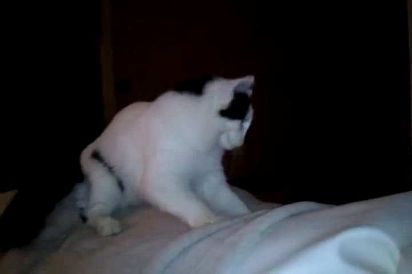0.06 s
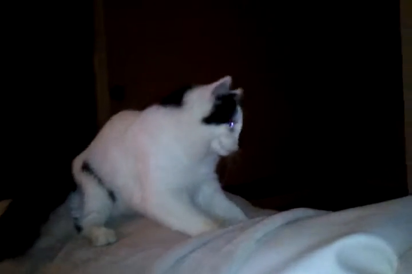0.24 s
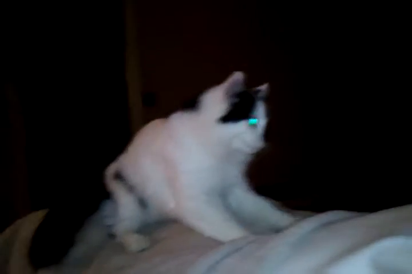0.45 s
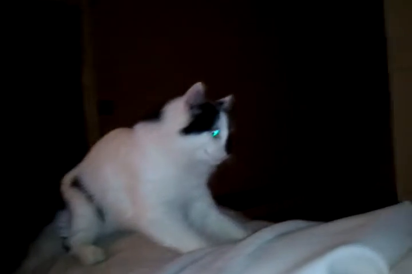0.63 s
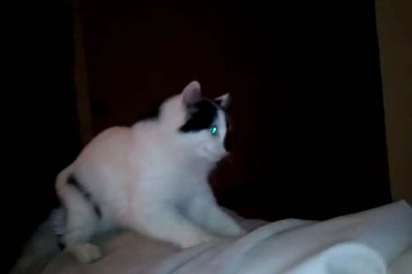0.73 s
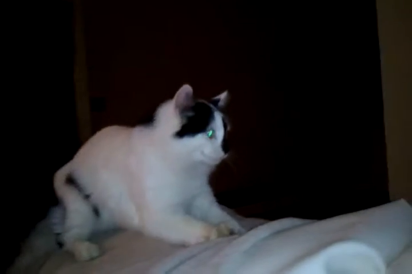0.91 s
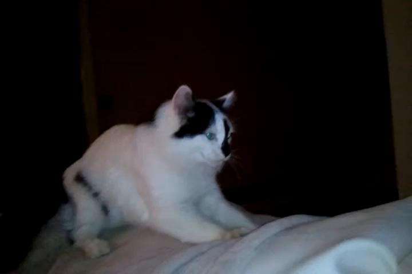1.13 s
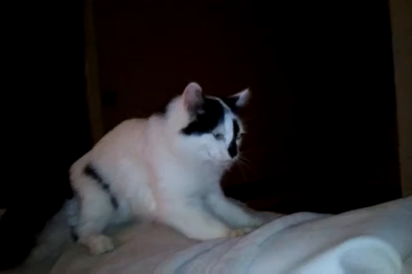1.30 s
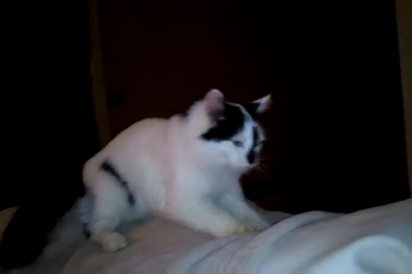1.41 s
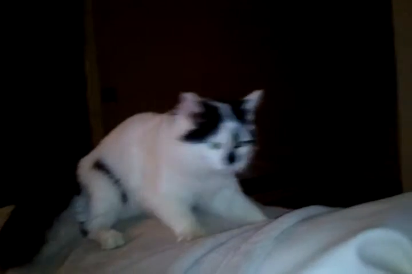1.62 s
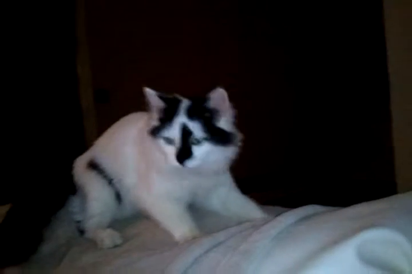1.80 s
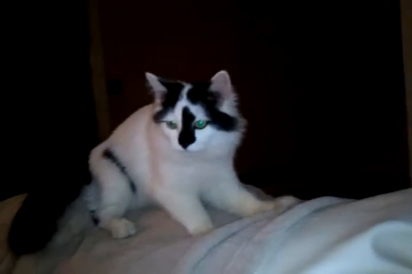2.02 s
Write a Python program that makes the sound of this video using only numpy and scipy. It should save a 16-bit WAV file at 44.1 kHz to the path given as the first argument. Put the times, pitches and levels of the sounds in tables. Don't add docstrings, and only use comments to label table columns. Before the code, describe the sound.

A cat purrs low and steadily on a bed in a quiet room; early on a paw rasps brightly over cloth, then slides softer, followed by louder purr, hiss and sparse claw ticks on a small noisy phone microphone.

```python
import sys
import numpy as np
from scipy import signal
from scipy.fft import rfft, irfft
from scipy.io import wavfile
from scipy.ndimage import uniform_filter1d

SR = 44100
rng = np.random.default_rng(int(sys.argv[2]) if len(sys.argv) > 2 else 0)


def voltage_ratio(decibels):
    exponent = np.asarray(decibels, float) / 20
    return 10 ** exponent


def put_to_file(sound):
    columns = np.atleast_2d(sound).T
    safe = np.clip(columns, -1, 1)
    whole_steps = np.round(safe * 32767)
    wavfile.write(sys.argv[1], SR, whole_steps.astype(np.int16))


N = 90537
TIME_S = np.arange(N) / SR

# start_s, pulses_per_s, effort_db, chest_tuning_ratio
PURR = [(0, 26, -41, 1.06), (.3, 26, -44, 1.01), (0.549, 26, -45, 0.75), (0.798, 26, -52, 1.4),
        (1.049, 28.7, -39, 0.97), (1.251, 26.5, -44, 0.82), (1.399, 26, -46, 0.83),
        (1.531, 26.2, -40.5, 1.079), (1.63, 27.1, -40, 1.12), (1.748, 26.2, -45, 1.196),
        (1.85, 26, -46.5, 0.9), (2.05, 20.3, -46.5, 1.12)]
# pitch_hz, width_hz, level_db
CHEST = [(51.6, 23.4, -4), (124.8, 23.5, -2), (176.3, 54, -8.5), (268.6, 200, -13.5)]
EFFORT_FOLLOW = [0.53, 0.74, 0.28, 0.46]

# start_s, peak_s, end_s
DRAG_TIMES = [
    (.702, .785, .826),
    (.775, .803, .82),
    (.835, .88, .918),
    (.895, .93, .963),
]
# level_db, pitch_hz
DRAG_FIBRES = [(-21, 5840), (-18, 6270), (-34, 5830), (-38.5, 4900)]
FIBRE_WIDTH = [1600, 1100, 1500, 2600]
DRAG_RISE = [-9, 2, -10.5, -8]
DRAG_FALL = [-7, -11.5, -7.5, 1]
DRAG_BROAD = [-4.5, -3.5, 1, -7.5]
DRAG_CLUMPS = [1.2, 1.4, 2.5, 1.1]
# pitch_hz, level_db_per_hz
CLOTH = [(120, -33.5), (300, 5), (600, -2.5), (1000, -1.5), (2000, 1.5), (4000, 2.5), (6500, -18.5),
         (7400, -12.5)]

# start_s, snap_db, ring_db, ring_hz, ring_time_s (to fall 60 dB)
TICKS = [
    (.6978, -26, -60, 2500, .005),
    (.8313, -20, -30, 2400, .003),
    (1.14, -25, -31, 2180, .028),
    (1.14, -60, -34, 600, .03),
    (1.14, -60, -38, 420, .05),
    (1.2242, -40, -33, 2050, .014),
    (1.8744, -24, -28, 800, .007),
    (1.9588, -31, -31, 370, .05),
    (1.9692, -28, -31, 1750, .014),
]
# start_s, length_s, level_db, pitch_hz, width_hz
RUBS = [(0, 0.25, -46.5, 1340, 300), (0, 0.46, -51, 1790, 300), (0, 0.18, -49, 2080, 483),
        (0, 0.16, -52, 695, 300), (0.549, 0.15, -41, 596, 300), (0.563, 0.08, -53, 4430, 1370),
        (0.555, 0.13, -56, 6360, 900), (.63, 0.33, -41, 1070, 1500), (0.676, 0.018, -39.5, 1372, 111),
        (0.911, 0.071, -38.5, 3590, 261), (0.885, 0.066, -44, 2840, 260), (0.944, 0.15, -48.5, 3040, 220),
        (0.946, 0.1, -48, 4050, 500), (0.964, 0.11, -51, 5700, 2000)]
# pitch_hz, level_db_per_hz
FLOOR = [(20, -26), (250, -35.5), (600, -40.5), (950, -44), (1350, -42.5), (2600, -49.5), (6000, -51),
         (7300, -58.5)]
# time_s, gain_db
GATE = [(0, -18.8), (.2, -18), (.45, -18.6), (.72, -18), (.8, -9), (.86, -5), (.92, -2.3), (.98, -1.2),
        (1.1, -.3), (2.05, 0)]


def evened(x):
    return x / np.sqrt(np.mean(x ** 2) + 1e-20)


def colour(x, points):
    f, level_db = np.transpose(points)
    hz = np.fft.rfftfreq(len(x), 1 / SR)
    gain = voltage_ratio(np.interp(np.log(hz + 1), np.log(f + 1), level_db))
    return irfft(rfft(x) * gain, len(x))


def resonate(x, hz, width):
    turn = np.exp(2j * np.pi * np.cumsum(hz * np.ones(len(x))) / SR)
    r = np.exp(-np.pi * width / SR)
    return 2 * (turn * signal.lfilter([1 - r], [1, -r], x / turn)).real


def twice(x, hz, width):
    return resonate(resonate(x, hz, width), hz, width)


def wander(size):
    once = uniform_filter1d(rng.standard_normal(N), size)
    return evened(uniform_filter1d(once, size))


def purr():
    s, rate, db, tuning = np.transpose(PURR)
    jitter, puff_fall, puff_share = 0.05, 0.22, 0.54
    turns = np.cumsum(np.interp(TIME_S, s, rate) * (1 + jitter * wander(size=1200))) / SR
    beats = np.diff(np.floor(turns), prepend=0) * voltage_ratio(2.0 * wander(size=900))
    puffs = np.exp(-(turns % 1) / puff_fall) * rng.standard_normal(N)
    tune = np.interp(TIME_S, s, tuning)
    effort_db = np.interp(TIME_S, s, db) - np.mean(db)
    out = np.zeros(N)
    for (hz, width, ring_db), follow in zip(CHEST, EFFORT_FOLLOW):
        pulse_ring = evened(twice(beats, hz * tune, width))
        puff_ring = evened(twice(puffs, hz * tune, width))
        ring = (1 - puff_share) * pulse_ring + puff_share * puff_ring
        power = uniform_filter1d(ring ** 2, size=3500) + 1e-3
        ring = evened(ring / power ** 0.3)
        out += voltage_ratio(np.mean(db) + ring_db + follow * effort_db) * ring
    return out


def drags():
    grains_per_s, grain_spread_db = 12000, 2.5
    out = np.zeros(N)
    settings = zip(DRAG_TIMES, DRAG_FIBRES, DRAG_RISE, DRAG_FALL, FIBRE_WIDTH, DRAG_BROAD, DRAG_CLUMPS)
    for (start, top, end), (db, hz), rise_db, fall_db, width, broad_db, clump_db in settings:
        strength = voltage_ratio(grain_spread_db * np.minimum(rng.exponential(1, N), 4))
        grains = strength * (rng.random(N) < grains_per_s / SR)
        grains = grains * rng.choice([-1., 1.], N) * voltage_ratio(clump_db * wander(size=80))
        fibres = evened(twice(grains, hz, width))
        sound = fibres + voltage_ratio(broad_db) * evened(colour(grains, CLOTH))
        shape = voltage_ratio(np.interp(TIME_S, [start, top, end], [rise_db, 0, fall_db]))
        edges = np.clip(np.minimum((TIME_S - start) / .025, (end - TIME_S) / .004), 0, 1)
        out += voltage_ratio(db) * shape * edges * sound
    linger = np.sqrt(np.abs(signal.lfilter([.003], [1, -.997], out ** 2)))
    after_hiss = twice(linger * rng.standard_normal(N), 5900, 2500)
    return out + voltage_ratio(-6) * after_hiss


def ticks():
    out, t = np.zeros(N), np.arange(4000) / SR
    snap = (1 - t / .0004) * np.exp(-t / .00007)
    snap_trim_db = 3.5
    for s, snap_db, ring_db, hz, ring_time in TICKS:
        fade_in = np.minimum(t / .0004, 1)
        ring = voltage_ratio(ring_db - 60 * t / ring_time) * np.sin(2 * np.pi * hz * t) * fade_in
        part = out[round(s * SR):][:len(t)]
        part += (voltage_ratio(snap_db + snap_trim_db) * snap + ring)[:len(part)]
    return out


def rubs():
    out = np.zeros(N)
    for start, length, db, hz, width in RUBS:
        progress = np.clip((TIME_S - start) / length, 0, 1)
        swell = np.sin(np.pi * progress ** .6)
        out += voltage_ratio(db) * swell * evened(twice(rng.standard_normal(N), hz, width))
    return out


def hiss_and_rumble():
    noise = colour(rng.standard_normal(N), FLOOR)
    band = resonate(noise, 4530, 5550)
    return voltage_ratio(-44.5 + 0.2 * wander(size=1500)) * noise / np.sqrt(np.mean(band ** 2))


def scene():
    return (purr() + drags() + ticks() + rubs() + hiss_and_rumble())[None]


def band_limit(x):
    return signal.sosfilt(signal.butter(12, 9200, fs=SR, output="sos"), x)


def record(dry):
    low_pass = signal.firwin(161, 7322, window=("kaiser", 8), fs=SR)
    x = signal.oaconvolve(dry, low_pass[None], "same")
    leak = voltage_ratio(-24.5) * twice(twice(dry[0], 8650, 880), 8650, 880)
    offset = -.212
    s, db = np.transpose(GATE)
    gain = voltage_ratio(uniform_filter1d(np.interp(TIME_S, s, db), size=1500))
    return band_limit((x + leak + offset) * gain)


dry = scene()
out = record(dry)
put_to_file(out)
```